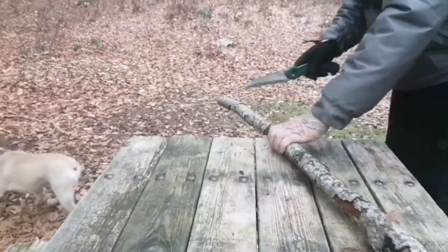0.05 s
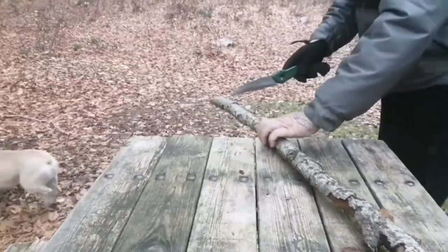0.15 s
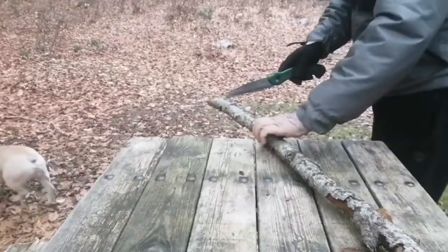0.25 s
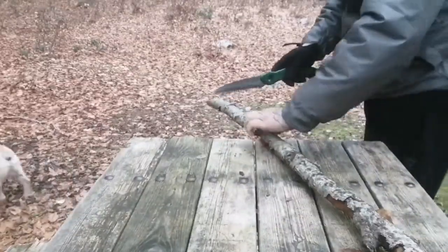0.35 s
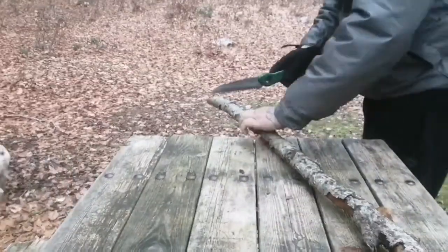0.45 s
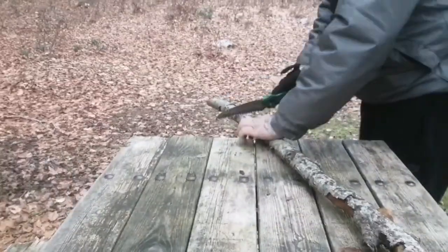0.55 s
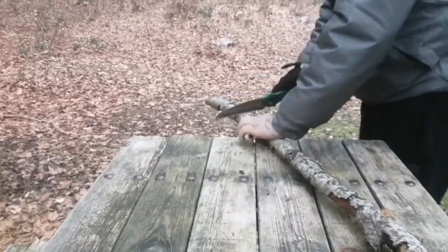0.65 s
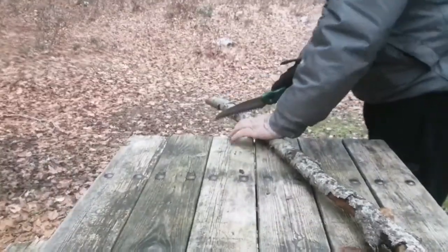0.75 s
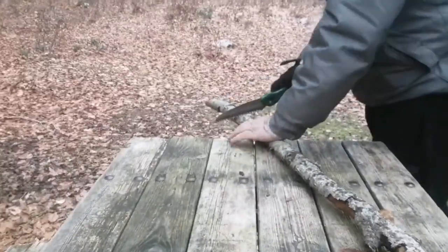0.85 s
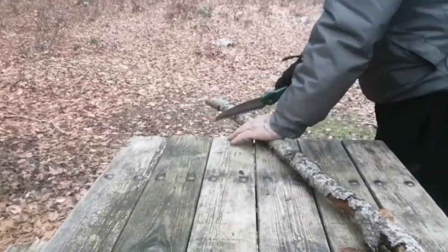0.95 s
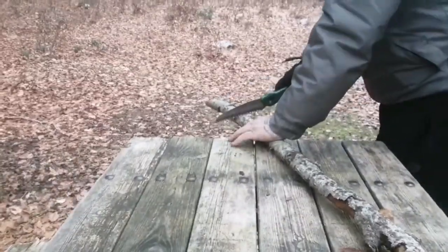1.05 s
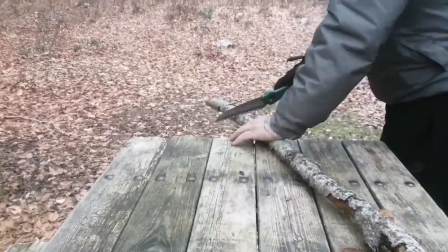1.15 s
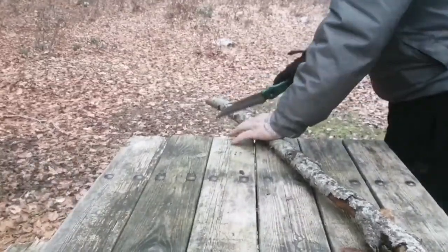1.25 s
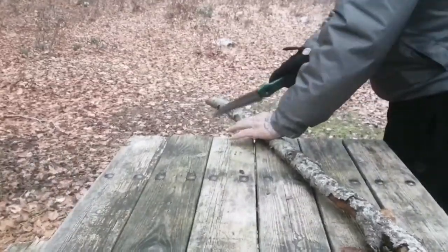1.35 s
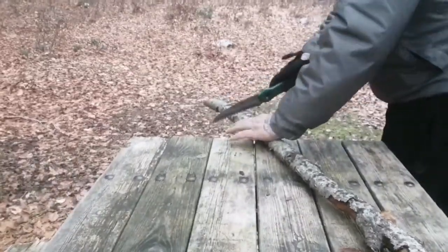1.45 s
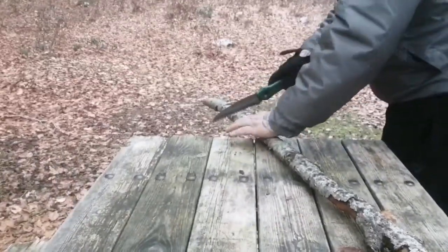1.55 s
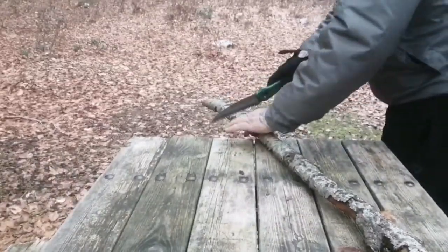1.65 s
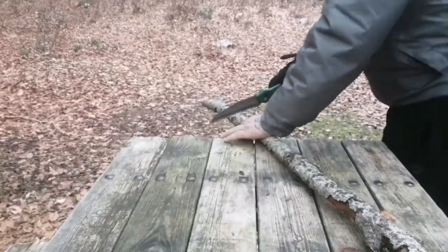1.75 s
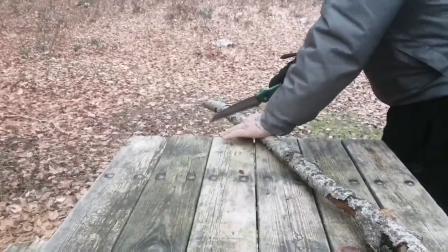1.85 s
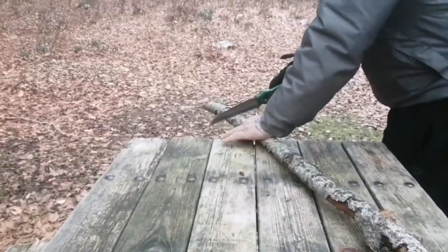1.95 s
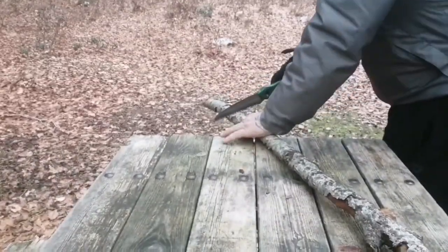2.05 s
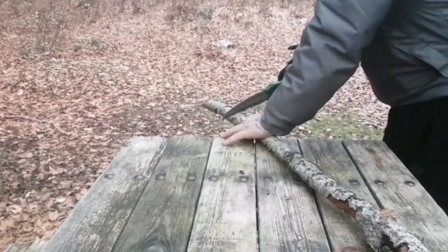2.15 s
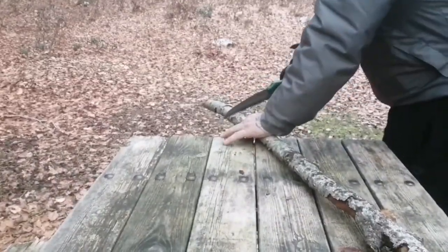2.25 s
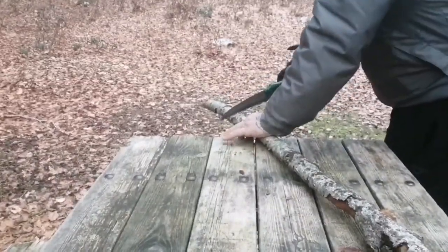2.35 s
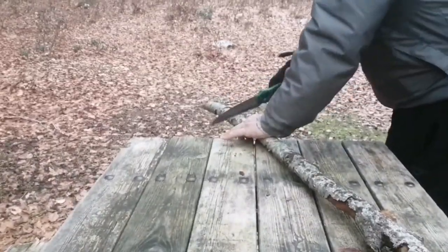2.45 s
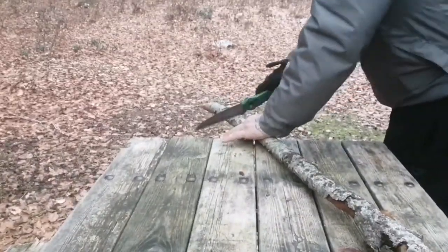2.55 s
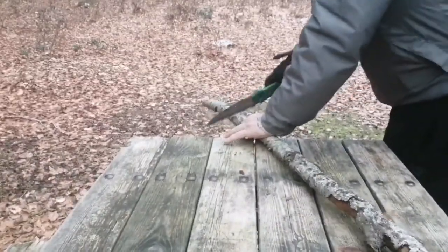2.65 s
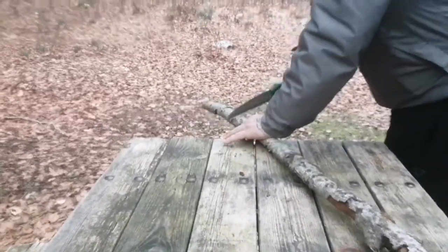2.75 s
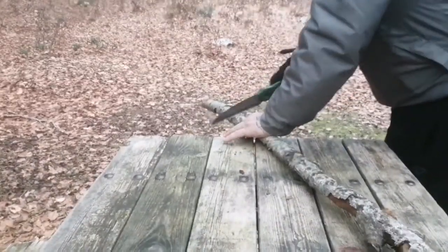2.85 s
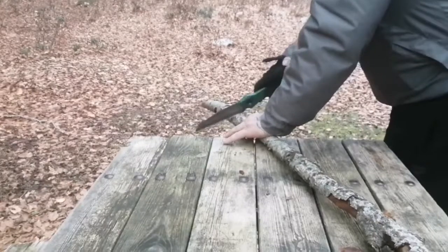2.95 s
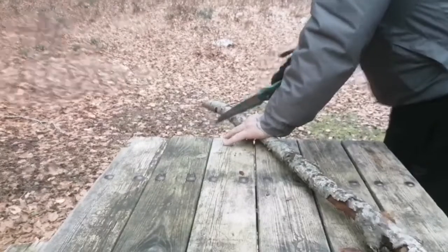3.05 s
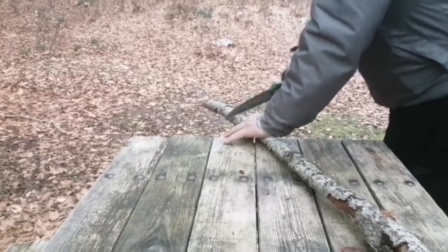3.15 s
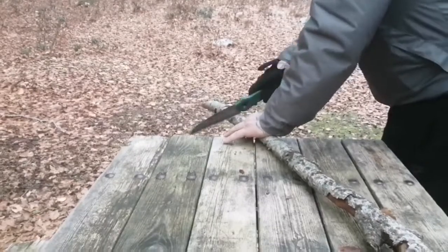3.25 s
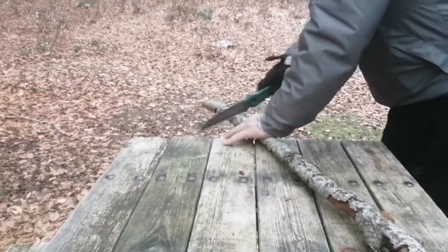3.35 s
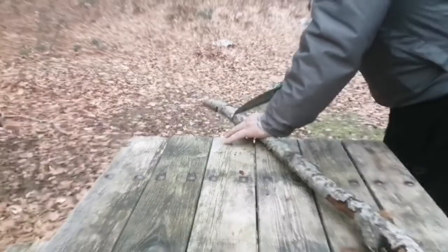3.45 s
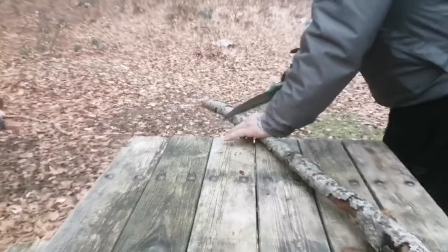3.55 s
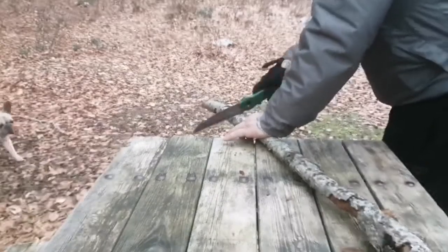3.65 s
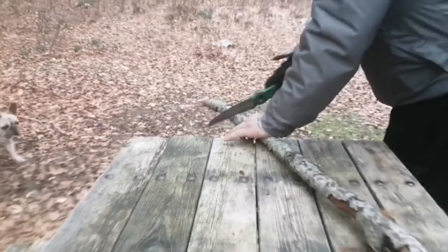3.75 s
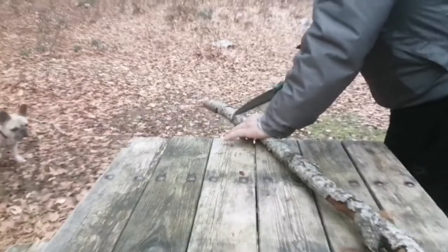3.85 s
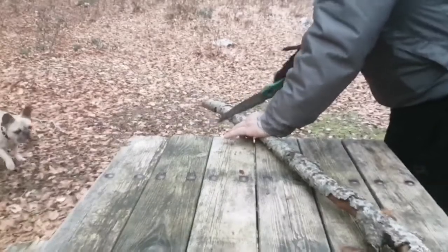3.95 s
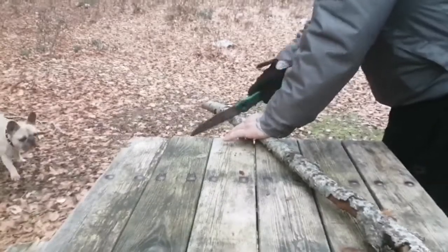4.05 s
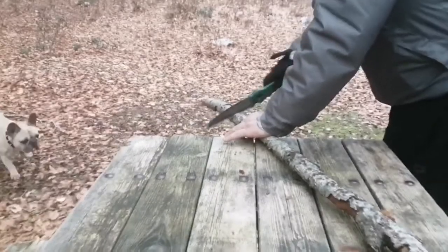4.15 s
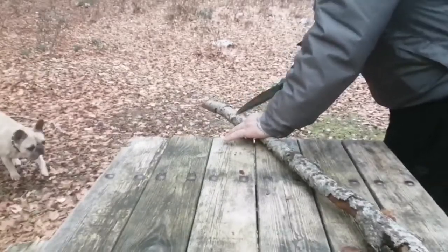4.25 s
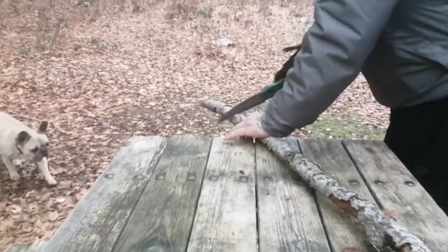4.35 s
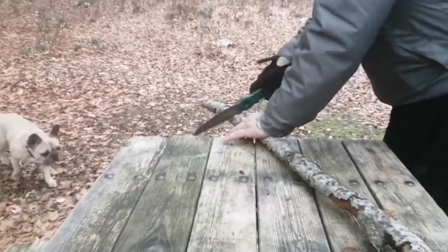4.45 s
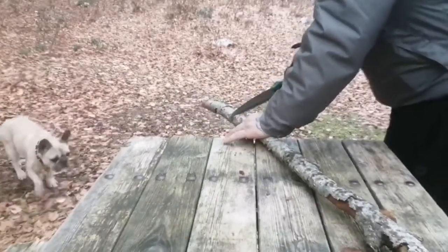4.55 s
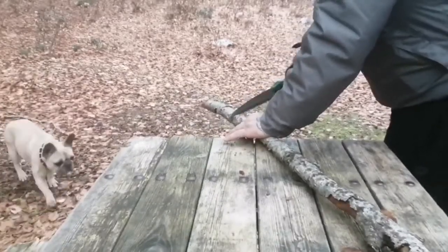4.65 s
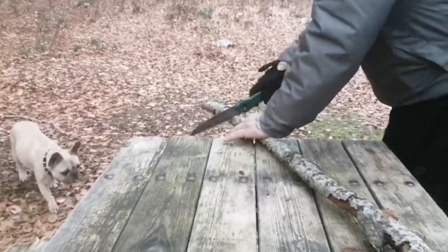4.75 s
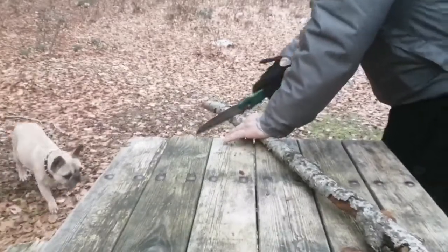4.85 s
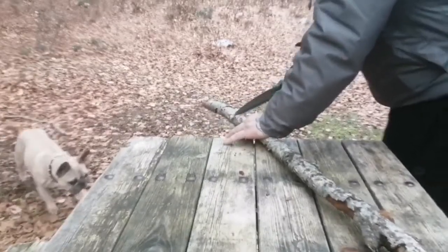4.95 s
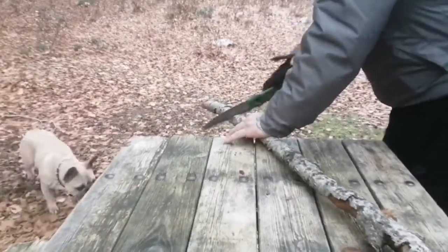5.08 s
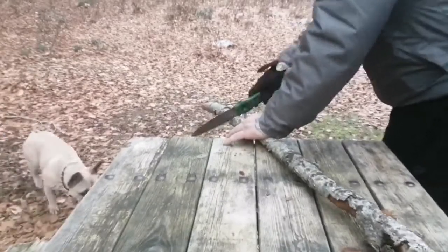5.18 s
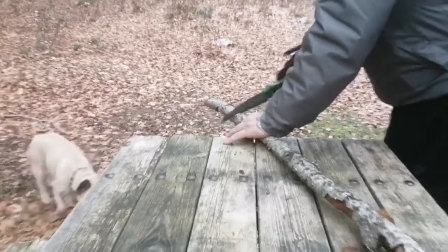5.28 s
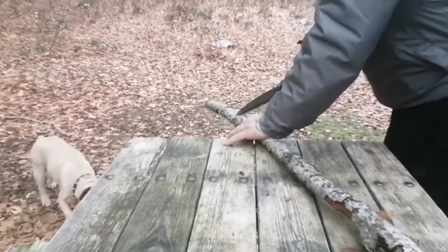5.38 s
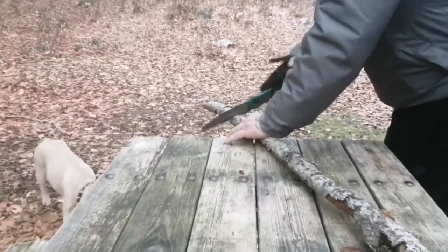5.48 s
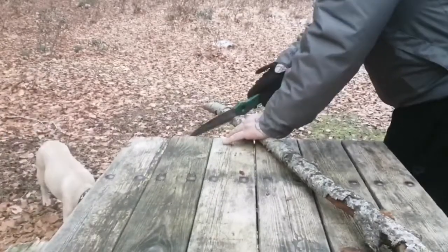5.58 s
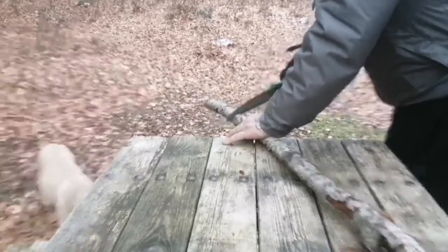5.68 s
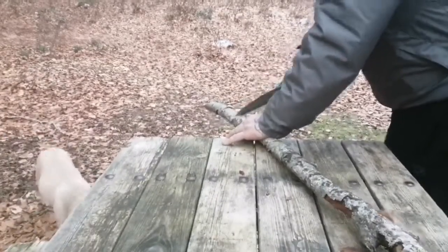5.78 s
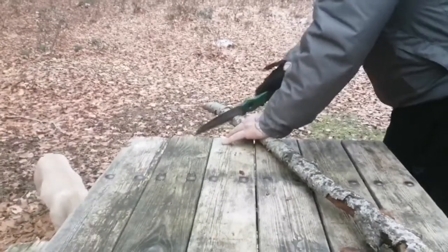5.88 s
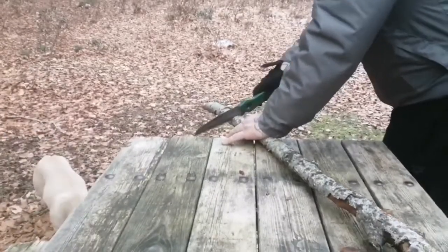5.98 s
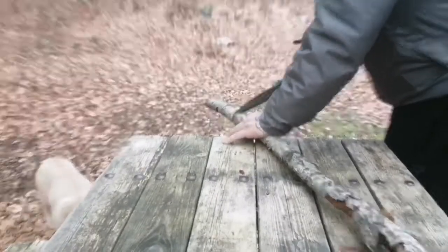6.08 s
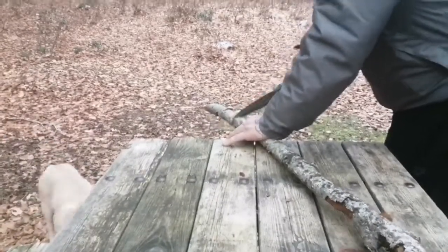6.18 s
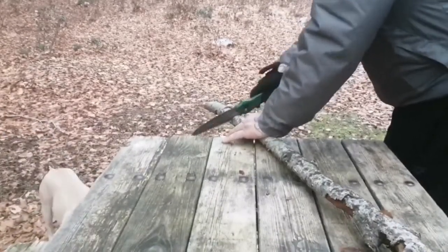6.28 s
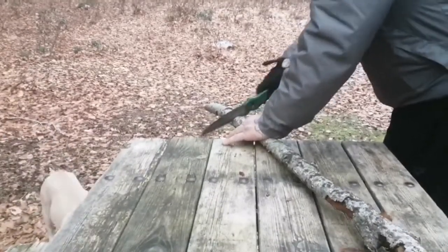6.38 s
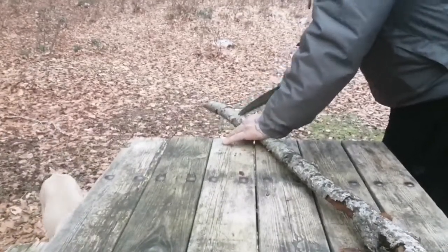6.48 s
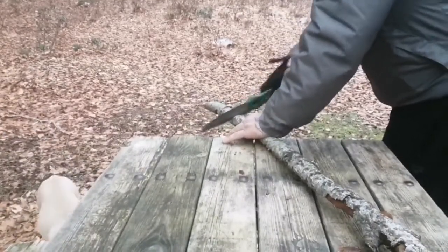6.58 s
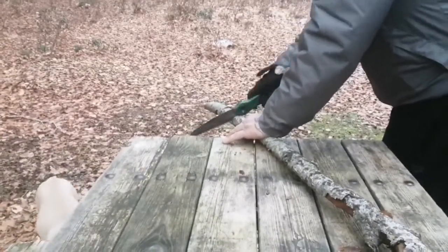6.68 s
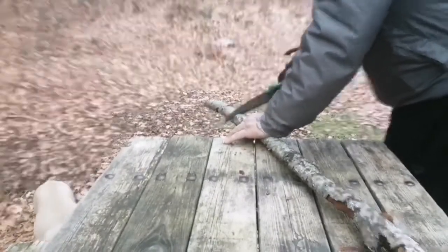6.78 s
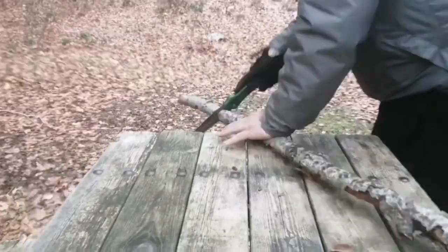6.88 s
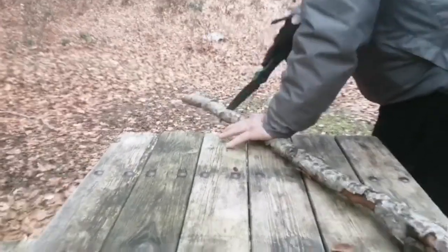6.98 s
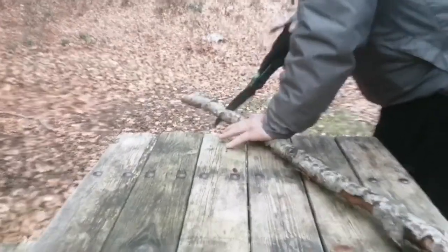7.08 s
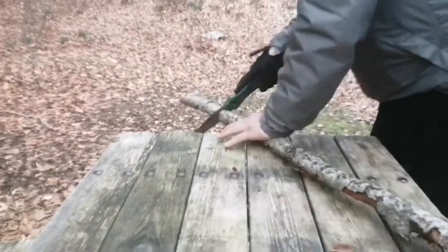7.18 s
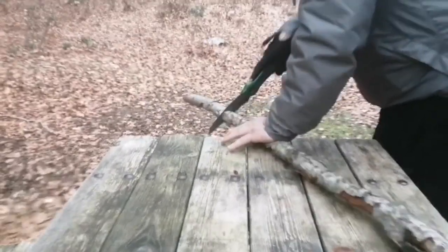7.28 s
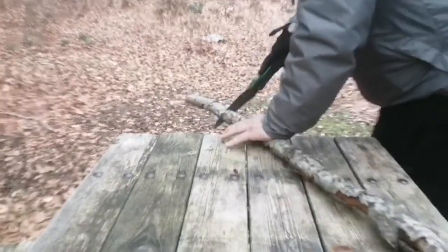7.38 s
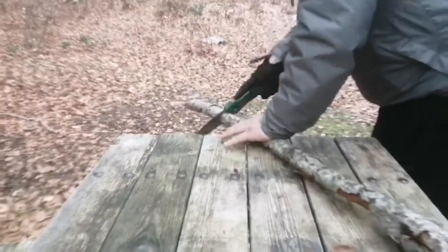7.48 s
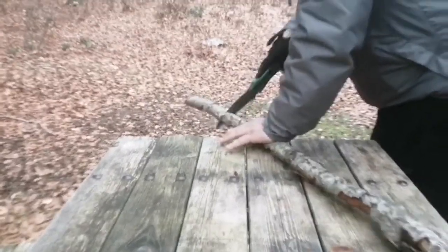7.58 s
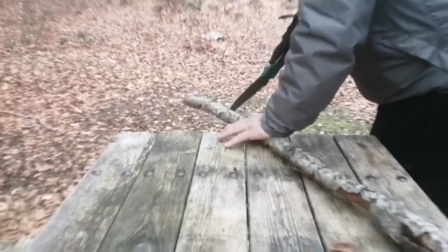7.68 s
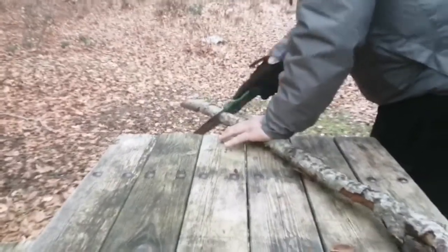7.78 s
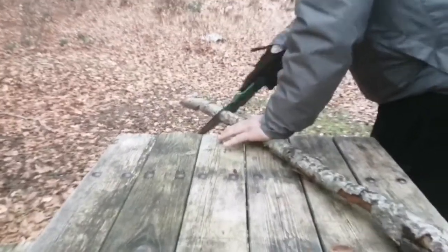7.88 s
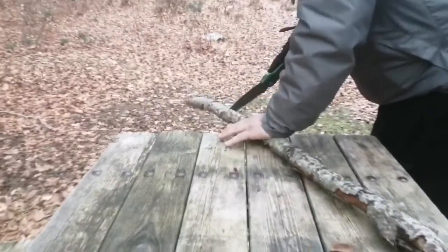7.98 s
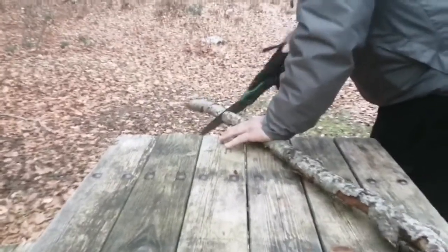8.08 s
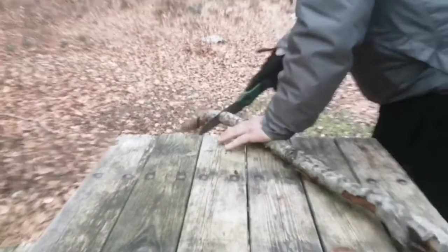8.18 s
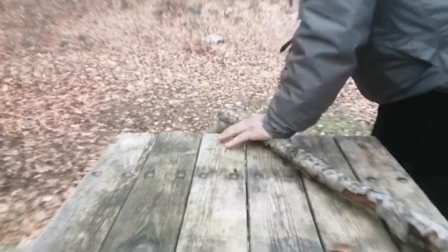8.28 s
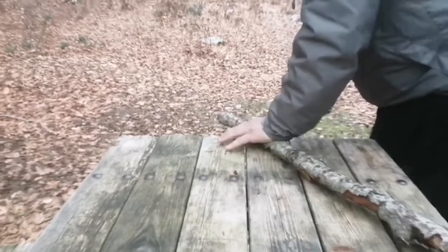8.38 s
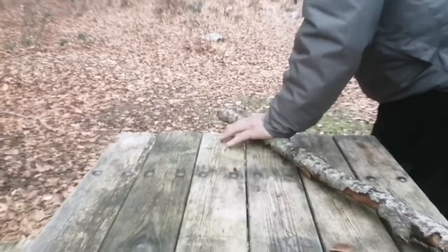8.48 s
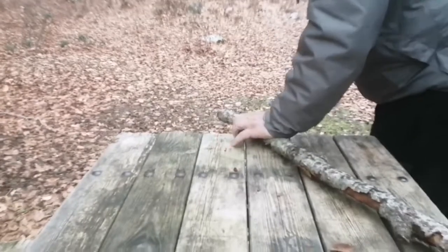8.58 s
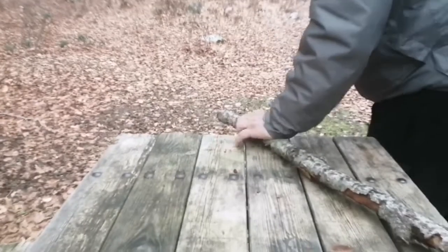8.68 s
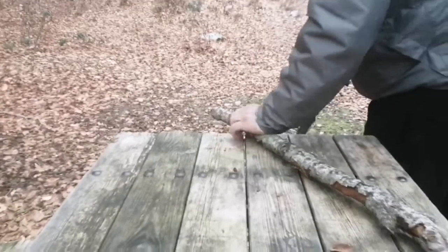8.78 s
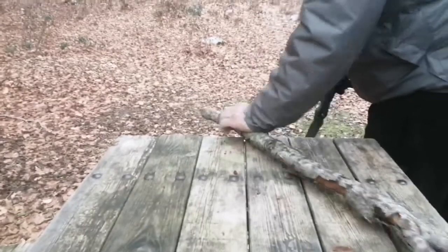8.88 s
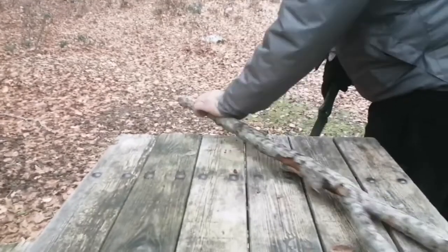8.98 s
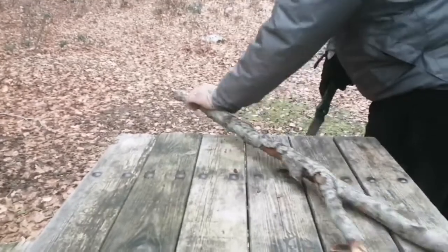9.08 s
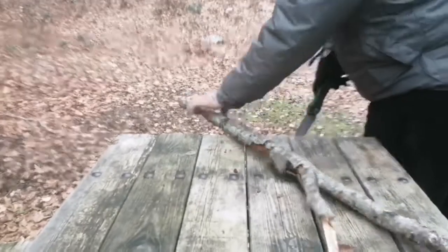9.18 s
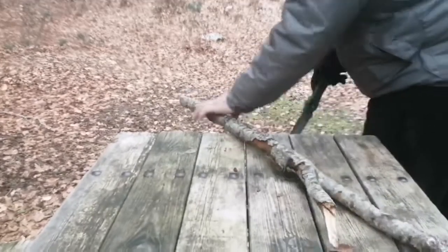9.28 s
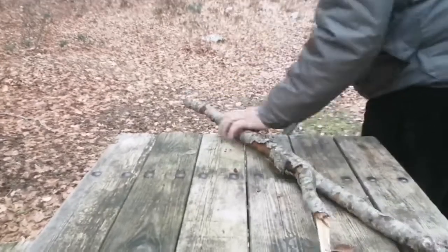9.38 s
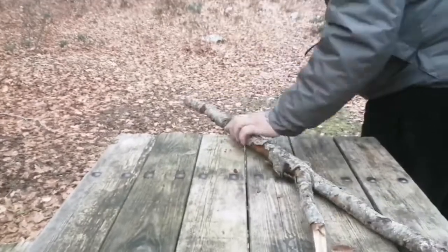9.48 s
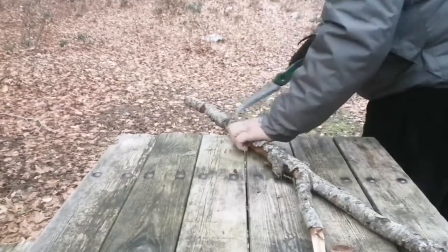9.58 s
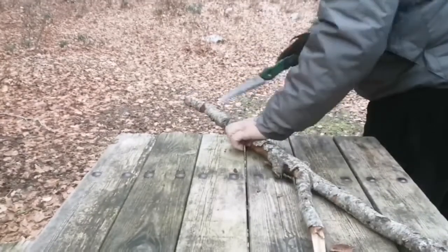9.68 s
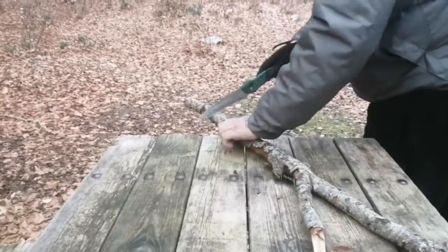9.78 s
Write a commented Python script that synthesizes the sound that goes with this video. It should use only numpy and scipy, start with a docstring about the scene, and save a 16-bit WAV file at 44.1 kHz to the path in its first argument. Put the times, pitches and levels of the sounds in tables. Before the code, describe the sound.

A hand saw rasps back and forth through a branch on a plank table, knocking and juddering, then the branch scrapes and thuds down.

```python
"""Hand saw on a branch

A hand saw cuts a branch held down on a plank table, outdoors among dry leaves. Tooth impulses and noise
drive wooden modes of branch and planks; shaped noise gives rasp and blade hiss. The branch rocks and
knocks, the teeth snag, the blade binds. After the cut the branch is dragged over the table and set down.
A sleeve swishes, leaves crackle, wind and the table shaken by sawing rumble low, all as shaped noise."""
import sys
import numpy as np
from scipy import signal
from scipy.fft import rfft, irfft, next_fast_len
from scipy.io import wavfile
from scipy.ndimage import uniform_filter1d, map_coordinates

SR = 44100
rng = np.random.default_rng(int(sys.argv[2]) if len(sys.argv) > 2 else 0)


def persist_wave(psi):
    """Save psi, clipped to +-1, as 16-bit WAV."""
    counts = np.round(np.clip(psi, -1, 1) * 32767).astype(np.int16)
    wavfile.write(sys.argv[1], SR, np.atleast_2d(counts).T)


N = 433503

# Low rumble of wind and of the table shaken by sawing. Each row: time in seconds, level in dB.
RUMBLE_LEVEL = [(0, -70), (.5, -56), (.85, -47.5), (1.3, -64), (2.3, -47.5), (6.7, -51), (7.1, -39),
                (8.4, -34), (8.8, -51), (9.5, -38.5), (9.83, -64)]
# Faint rustle of dry leaves. Each row: time in seconds, level in dB.
LEAVES_LEVEL = [(0, -47.5), (.48, -71.5), (.6, -58), (1.3, -63.5), (2.8, -59.5), (9.83, -59.5)]
# Swish of a jacket sleeve. Each row: time in seconds, level in dB before a 3 dB cut.
SLEEVE_LEVEL = [(0, -54), (.25, -49.5), (.45, -65)]
# Branch sliding over the planks. Each row: time in seconds, bark hiss in dB, scrape in dB.
DRAG_LEVELS = [(8.66, -54.5, -59), (8.79, -66, -78), (8.87, -42.5, -52.5), (9.0, -47.5, -42),
               (9.05, -36.5, -43), (9.075, -45, -40.5), (9.088, -35.5, -46), (9.17, -37, -41),
               (9.26, -44.5, -47), (9.33, -72, -60)]
# Blade squeaks on the bark. Each row: start in seconds, level in dB, pitch in Hz.
SQUEAKS = [(1.431, -38.5, 2560), (2.454, -40, 2730)]
# Branch laid down, jerked by the jamming blade, set aside. Each row: start in seconds, body peak in dB,
# hardness in dB (before offsets), then relative to the body: crack in dB (before a 4 dB cut),
# boost of the table boom modes in dB, clack in dB.
BRANCH_KNOCKS = [(0.638, -20, -3.5, -17, 12, -36), (0.644, -21, -4, -18, 6, -38),
                 (0.751, -34.5, -14.5, -30, 5, -34), (0.884, -38.5, -5, -30, 5, -32),
                 (1.486, -22.5, -13.5, -17.5, 5.5, -13), (1.493, -24, -17, -30, 2, -15.5),
                 (1.843, -41.5, -6, -10, -8, -20), (6.925, -19.5, 4, -11.5, -13, -14),
                 (7.262, -22, 6, -16, -6, -5), (7.5774, -12, 5, -14.5, -5, -1),
                 (8.206, -15, 9, -16, -1, -1), (8.45, -22.5, -14.5, -29, -12, -22),
                 (8.541, -30, -19, -38, -4, -27), (8.61, -19, -8.5, -21.5, -5, -9),
                 (8.627, -25, -16, -7.5, -6, -17.5), (9.271, -14.5, -16, -14.5, -3, -24),
                 (9.33, -21.5, -16.5, -37, -6, -37), (9.519, -25, -8, -37, -9, -20),
                 (9.594, -27.5, 21, -14, -4, -6.5)]
# Single teeth snag, splinters snap. Each row: start in seconds, peak in dB,
# woody snap over steel ring in dB (before offsets).
TOOTH_CATCHES = [(0.753, -41, -30), (1.389, -45.5, -37), (1.9672, -32.5, -16.5), (6.929, -19, 4),
                 (7.1166, -23, -14), (7.372, -22.5, 12), (7.4065, -21.5, -8), (7.4378, -21, -11),
                 (7.7425, -19.5, -13.5), (7.9327, -23, -4), (8.0766, -22.5, -7), (8.118, -20.5, 3.5),
                 (8.206, -20, 5), (8.234, -15.5, 2), (8.357, -31, -10), (8.402, -28.5, -6.5),
                 (8.6084, -25.5, 15), (8.874, -35, -28), (9.053, -20, -12)]

# Modes of the table top, the branch on it, and the short clack of struck wood.
# Each row: frequency in Hz, level in dB, 60 dB decay in seconds (undamped).
PLANK_MODES = [(59, -13, 0.27), (85, -12, 0.28), (132.8, -10, 0.39), (157.4, -14, 0.33), (209, -4.5, 0.14),
               (238.3, -3, 0.23), (287.5, -1.5, 0.12), (365, 1, 0.078)]
BRANCH_MODES = [(489.7, 1, 0.074), (552, 1.5, 0.023), (651, 0, 0.078), (780, 0, 0.041), (878, -6.5, 0.032),
                (1082, -8.5, 0.036), (1426, -4.5, 0.02), (1524, -10, 0.022), (1915, -14, 0.038)]
CLACK_MODES = [(783, 2.5, 0.031), (1014, 3, 0.016), (1230, -3.5, 0.027), (1518, -6.5, 0.013)]

# Relative spectra, scaled to rms 1 in use. Each row: frequency in Hz, density in dB per Hz.
RUMBLE_SPECTRUM = [(25, -12), (55, -2.5), (100, -7.5), (400, -29), (1000, -101)]
LEAVES_SPECTRUM = [(100, 0), (1700, -19.5), (3200, -18), (4000, -25), (6400, -12), (7400, -15.5),
                   (7900, -50.5)]
CLOTH_SPECTRUM = [(200, -33), (500, -4), (1700, -25.5), (3200, -5.5), (4000, -12.5), (7000, 0.5),
                  (7900, -33)]
BARK_SPECTRUM = [(600, -33.5), (1100, -8), (1400, -9), (2100, -14.5), (3200, -6), (3900, -14), (5000, -0.5),
                 (6300, 3.5), (7300, 2), (7900, -37)]
SNAP_SPECTRUM = [(500, 4), (1100, 7), (1600, -2.5), (2200, -8.5), (3200, -7.5), (4000, -25), (7000, -36.5)]
BUZZ_SPECTRUM = [(100, -23), (220, 4.5), (700, -5), (1300, -18.5), (4000, -68.5)]
RASP_SPECTRUM = [(500, -19.5), (1000, 5), (1300, -12), (1550, -4.5), (1900, -8.5), (2250, -13.5),
                 (2950, -8), (3900, -16), (5000, -10.5), (7500, -43)]
BLADE_SPECTRUM = [(2500, -60.5), (4000, -26.5), (4600, -6), (5300, 2), (5900, 4.5), (6400, 3.5),
                  (7100, 7.5), (7600, -19)]

# Saw pushes: the first is a light trial, the one at 6.8 s jams at once. Each row: start in seconds,
# force in dB, extra plank thrum in dB, tooth catch peak in dB, delay of the rocking knock in seconds,
# peak of that knock in dB.
PUSHES = [(2.072, -18.5, 5, -50.5, 0.062, -38), (2.643, 2.5, -3, -38.5, 0.077, -16.5),
          (3.012, 2, 8.5, -34, 0.074, -25), (3.385, 0.5, 7, -27, 0.06, -16),
          (3.759, -1, 1.5, -36, 0.066, -16), (4.157, 1.5, -12.5, -24, 0.062, -22),
          (4.533, 0, -2.5, -27, 0.068, -17.5), (4.912, 1, -3, -29.5, 0.068, -19.5),
          (5.288, -0.5, -5, -28, 0.079, -17), (5.68, 0.5, -1.5, -27.5, 0.08, -17.5),
          (6.049, -0.5, 1, -27.5, 0.087, -13), (6.417, -1.5, -5, -30.5, 0.054, -26.5),
          (6.804, -10, -18, -24.5, .056, -18.5), (6.977, -3.5, 0.5, -15.5, 0.068, -8.5),
          (7.296, -3.5, 6.5, -24, 0.075, -10), (7.624, -1, 1.5, -41, 0.076, -16),
          (7.941, 1, -5.5, -29.5, .065, -15.5), (8.239, 2, 2, -28, 0.096, -18.5)]
# Saw pulls. Each row: start in seconds, force in dB, delay until the blade binds in seconds,
# peak judder level in dB.
PULLS = [(2.418, -2.5, 0.15, -36), (2.838, 0, 0.12, -26.5), (3.21, 0, 0.12, -27.5),
         (3.584, -0.5, 0.11, -26.5), (3.963, -1.5, 0.12, -30), (4.353, 1, 0.13, -37),
         (4.739, 1, 0.12, -22.5), (5.114, 1.5, 0.12, -27), (5.504, 1, 0.13, -30.5), (5.879, 2, 0.14, -31),
         (6.246, 0, 0.14, -28), (6.616, -1, .114, -27.5), (6.847, -0.5, 0.074, -28.5),
         (7.148, -1.5, 0.097, -28.5), (7.472, 2, .094, -24), (7.792, 1.5, 0.1, -27),
         (8.099, 2.5, 0.089, -36)]
# Times in seconds when the cut is fresh, deep and nearly through.
STAGES_S = [2.4, 6.4, 7.1]
# Stroke sound, one row per stage: fastest moment as a share of the stroke, then in dB at force 0:
# plank thrum, branch growl, rasp, blade hiss, boost of the table boom modes, tooth buzz.
PUSH_SOUND = [(.55, -35, -39, -47.5, -47.5, 19.5, -49), (.54, -34.5, -40.5, -46, -45.5, 6.5, -50.5),
              (.48, -36.5, -41.5, -48, -46.5, -14.5, -46.5)]
PULL_SOUND = [(0.5, -33.5, -36, -48.5, -47.5, 9, -43.5), (.5, -34.5, -34, -46, -48, -8, -39),
              (.6, -33.5, -33.5, -47.5, -46.5, -9, -43.5)]
# One value per stage: level of breaking fibres within the rasp in dB.
SPLINTER_DB = (2.5, -3, 11)
# One value per stage: centre of the wood note at a catch in Hz.
CATCH_NOTE_HZ = (1560, 1540, 1005)
# One value per stage: woody snap over steel ring at a push in dB (before offsets).
CATCH_WOOD_DB = (-11.5, -4, -0.5)
# One value per stage: clack of the rocking branch in dB.
ROCK_CLACK_DB = (-20.5, -17, -21.5)
# One value per stage: boost of the table boom modes when the branch rocks in dB.
ROCK_BOOM_DB = (1.5, -4, -9)
# Rocking knock per stage: hardness and crack, before the same offsets as in the knock table.
ROCK_HARD_DB, ROCK_CRACK_DB = (-16, -10.5, -10), (-24, -31, -31)

PUSH_TOOTH_HZ, PUSH_GROWL_HZ = 521.3, 930  # top tooth rate, growl centre
PULL_TOOTH_HZ, PULL_GROWL_HZ = (559.2, 661.5, 493.7), (735, 656, 486)  # the same per stage
# scatter of the bites in tooth spacings; pulls per stage
PUSH_JITTER, PULL_JITTER = .2, (.13, .1, .13)
GROWL_PER_FORCE, RASP_PER_FORCE, HISS_PER_FORCE = 0.45, 0.94, 1.12  # dB per dB of force
CUT_THROUGH_S, LONGEST_STROKE_S = 8.374, .266
CATCH_AFTER_S = .015  # from the start of a push
# blade note: level over the hiss
RING_HZ, RING_WIDTH_HZ, RING_DB = 6040, 200, 4
# where along its travel the blade rings (0 pushed in, 1 drawn back), and over what share
RING_PLACE, RING_REACH = 0.32, 0.092
# binding per stage: surge of the cutting noise, pitch of the judder at its middle
BIND_DB, JUDDER_HZ = (5, 1.5, 2.5), (270.3, 276, 450)
BIND_S, JUDDER_SAG_PER_S = 0.019, 3.5  # Gaussian half length; share of pitch lost per second
TOP_HZ = 7790  # band limit


def amp(db):
    """Decibels to gain."""
    return 10 ** (np.asarray(db) / 20)


def unit(x):
    """Scale to rms 1."""
    return x / np.sqrt(np.mean(x ** 2) + 1e-20)


def curves(rows):
    """One value per sample for each dB column, -120 dB outside the rows."""
    s, *columns = np.transpose(rows)
    return [np.interp(np.arange(N) / SR, s, column, left=-120, right=-120) for column in columns]


def wobble(rate_hz):
    """Smooth random curve with rate_hz knots a second."""
    knots = rng.standard_normal(int(N * rate_hz / SR) + 4)
    return map_coordinates(knots, [np.arange(N) * rate_hz / SR])


def filtered(x, gain):
    """x times a gain that depends on frequency."""
    size = next_fast_len(len(x) + 8192)
    spectrum = rfft(x, size) * gain(np.fft.rfftfreq(size, 1 / SR))
    return irfft(spectrum, size)[:len(x)]


def coloured(x, spectrum):
    """x shaped by a (Hz, dB) spectrum, at rms 1."""
    hz, db = np.transpose(spectrum)
    return unit(filtered(x, lambda f: amp(np.interp(np.log(f + 1), np.log(hz), db))))


def patchy(depth_db):
    """Noise whose narrow bands swell and fade on their own."""
    bands = signal.stft(rng.standard_normal(N), nperseg=512)[2]
    field = uniform_filter1d(rng.standard_normal(bands.shape), size=4, axis=0)
    field = uniform_filter1d(field, size=4, axis=1)
    return signal.istft(bands * amp(depth_db * unit(field)), nperseg=512)[1][:N]


def add(track, s, sound):
    """Mix a sound into the track at time s."""
    start = max(round(s * SR), 0)
    part = sound[:N - start]
    track[start:start + len(part)] += part


def by_depth(s, stages):
    """Values that pass from stage to stage as the cut deepens."""
    shares = [np.interp(s, STAGES_S, stage) for stage in np.eye(len(STAGES_S))]
    return np.dot(shares, stages)


def ring(modes, scatter_db, detune, damping=1, boom_db=0, boom_hz=138, direct=False):
    """Impulse response of wooden modes, a little different at each contact; energy 1."""
    t = np.arange(SR // 3) / SR
    hz, db, t60 = np.transpose(modes)[:, :, None]
    size, shift = rng.standard_normal((2, len(modes), 1))
    # where and how hard the wood is pressed favours the modes around one frequency
    boom = boom_db * np.exp(-(np.log2(hz / boom_hz) / .35) ** 2)
    decay = amp(db + boom + scatter_db * size - 60 * t * damping / t60)
    # a direct blow starts all modes together; from farther along the wood their signs alternate
    sign = 1 if direct else (-1) ** np.arange(len(modes))[:, None]
    h = np.sum(sign * decay * np.sin(2 * np.pi * hz * (1 + detune * shift) * t), axis=0)
    # wood radiates little below its lowest mode
    h = signal.lfilter(*signal.butter(2, hz.min() / 2, "high", fs=SR), h)
    return h / np.linalg.norm(h)


def low_rumble():
    """Low rumble of wind and of the table shaken by sawing: low noise in random swells."""
    swells = amp(5.7 * wobble(9.7))
    return amp(curves(RUMBLE_LEVEL)[0]) * coloured(rng.standard_normal(N) * swells, RUMBLE_SPECTRUM)


def dry_leaves():
    """Leaf crackle: noise with fast, medium and slow random level swings."""
    crackle = amp(3 * wobble(300) + 2 * wobble(25) + 1.5 * wobble(3))
    return amp(curves(LEAVES_LEVEL)[0]) * coloured(rng.standard_normal(N) * crackle, LEAVES_SPECTRUM)


def sleeve():
    """Cloth friction: noise roughened by random level swings."""
    weave = amp(2.6 * wobble(400) + 1.8 * wobble(70))
    return amp(curves(SLEEVE_LEVEL)[0] - 3.0) * coloured(rng.standard_normal(N) * weave, CLOTH_SPECTRUM)


def drag():
    """Rough bark skids over the grain of the planks and shakes branch and table."""
    hiss_db, scrape_db = curves(DRAG_LEVELS)
    grain = amp(2 * wobble(500) + 1.8 * wobble(45))
    hiss = coloured(grain * patchy(depth_db=2.2), BARK_SPECTRUM)
    branch = ring(BRANCH_MODES, scatter_db=2.0, detune=0.08)
    planks = ring(PLANK_MODES, scatter_db=3.0, detune=0.012, boom_db=-15)
    scrape = unit(signal.fftconvolve(grain * rng.standard_normal(N), branch + 0.92 * planks)[:N])
    return amp(hiss_db) * hiss + amp(scrape_db) * scrape


def squeaks(slip_s=0.0076, swell_s=0.0016, fade_db=1.5, grit_db=-18):
    """The blade sticks and slips on the bark three times, each slip a tiny squeal."""
    out, t = np.zeros(N), np.arange(SR // 30) / SR
    swell = (t / swell_s) ** 2 * np.exp(2 - 2 * t / swell_s)
    for s, db, hz in SQUEAKS:
        for slip in range(3):
            phase_drift = np.cumsum(0.17 * rng.standard_normal(len(t)))
            tone = np.sin(2 * np.pi * hz * t + phase_drift)
            grit = amp(grit_db) * coloured(rng.standard_normal(len(t)), BARK_SPECTRUM)
            add(out, s + slip_s * slip, amp(db - fade_db * slip) * swell * (tone + grit))
    return out


def rocking():
    """Each push tips the branch, which falls back on the planks; rows as in BRANCH_KNOCKS."""
    stage_tables = ROCK_HARD_DB, ROCK_CRACK_DB, ROCK_BOOM_DB, ROCK_CLACK_DB
    return [(s + delay_s, db, *(by_depth(s, stages) for stages in stage_tables))
            for s, *_, delay_s, db in PUSHES]


def knocks(crack_t60=0.047, chatter_t60=0.065, chatter_db=-25, contact_hz=1150):
    """The branch drops onto the planks, chatters briefly and rings both."""
    out, t = np.zeros(N), np.arange(SR // 3) / SR
    for s, db, hard_db, crack_db, boom_db, clack_db in BRANCH_KNOCKS + rocking():
        # a branch pressed hard enough to clack is also damped
        damping = np.interp(clack_db, [-20, 0], [1, 1.9])
        planks = ring(PLANK_MODES, scatter_db=4.5, detune=0.03, damping=damping,
                      boom_db=boom_db, direct=True)
        branch = ring(BRANCH_MODES, scatter_db=2.5, detune=0.035, damping=1.25 * damping,
                      boom_db=4, boom_hz=530, direct=True)
        chatter = amp(chatter_db - 60 * t / chatter_t60) * rng.standard_normal(len(t))
        chatter[0] = 1
        body = signal.fftconvolve(planks + amp(hard_db + 7) * branch, chatter)[:len(t)]
        # a softer blow stays in contact longer and leaves out the upper modes
        cutoff_hz = min(contact_hz * amp(hard_db / 2), SR / 4)
        body = signal.lfilter(*signal.butter(3, cutoff_hz, fs=SR), body)
        clack = signal.fftconvolve(ring(CLACK_MODES, scatter_db=4, detune=0.045), chatter)[:len(t)]
        crack = coloured(rng.standard_normal(len(t)), BARK_SPECTRUM) * amp(-60 * t / crack_t60)
        sound = body / np.abs(body).max()
        sound += amp(clack_db) * clack / np.abs(clack).max()
        sound += amp(crack_db - 4.0) * crack
        add(out, s, amp(db) * sound)
    return out


def snagging():
    """The teeth catch just after each push begins; rows as in TOOTH_CATCHES."""
    return [(s + CATCH_AFTER_S, db, by_depth(s, CATCH_WOOD_DB)) for s, _, _, db, *_ in PUSHES]


def catches(snap_t60=0.03, note_t60=0.027, slip_s=0.015, slip_db=-21, ping_hz=6700, ping_db=-1):
    """A tooth slips, then snags: a dry snap, a short note in the wood and a ring of steel."""
    out, t = np.zeros(N), np.arange(SR // 10) / SR
    onset = 1 - np.exp(-t / 0.00031)
    for s, db, wood_db in TOOTH_CATCHES + snagging():
        centres_hz = np.array([by_depth(s, CATCH_NOTE_HZ), ping_hz])
        note_hz, steel_hz = centres_hz * (1 + .04 * rng.standard_normal(2))
        for at, contact_db in (s - slip_s, slip_db), (s, 0):
            wood, steel = rng.standard_normal((2, len(t)))
            snap = amp(wood_db + 10.5) * coloured(wood, SNAP_SPECTRUM) + coloured(steel, BLADE_SPECTRUM)
            snap *= amp(-60 * t / snap_t60)
            note = amp(wood_db + 4.5 - 60 * t / note_t60) * np.sin(2 * np.pi * note_hz * t)
            ping = amp(ping_db - 60 * t / note_t60) * np.sin(2 * np.pi * steel_hz * t)
            sound = (snap + note + ping) * onset
            add(out, at, amp(db + contact_db) * sound / np.abs(sound).max())
    return out


def splinters(count=420, centre_hz=1450, spread_octaves=.4, t60=0.026):
    """Single fibres break at random, each a short woody note; level follows cut depth."""
    out, t = np.zeros(N), np.arange(SR // 20) / SR
    times = rng.uniform(STAGES_S[0], CUT_THROUGH_S, count)
    pitches = np.clip(rng.standard_normal(count), -2, 2)
    for s, pitch in zip(times, pitches):
        note = np.sin(2 * np.pi * centre_hz * 2 ** (spread_octaves * pitch) * t)
        add(out, s, note * amp(by_depth(s, SPLINTER_DB) - 60 * t / t60))
    return out


def binding():
    """In each pull the blade binds, the branch judders at a falling pitch; gives judder and surge in dB."""
    judder, surge_db = np.zeros((2, N))
    t = np.arange(-SR // 10, SR // 10) / SR
    swell, waver = np.exp(-(t / BIND_S) ** 2), wobble(120)
    for s, _, delay_s, db in PULLS:
        bend = 1 - JUDDER_SAG_PER_S * t + .05 * waver[int(s * SR):][:len(t)]
        phase = 2 * np.pi * np.cumsum(by_depth(s, JUDDER_HZ) * bend) / SR
        start = s + delay_s + t[0]
        add(judder, start, amp(db) * swell * (np.sin(phase) + .22 * np.sin(2 * phase)))
        add(surge_db, start, by_depth(s, BIND_DB) * swell)
    return judder, surge_db


def strokes():
    """Pushes and pulls in time order, ending at the next or at a limit; direction, depth, force set sound."""
    moves = [(s, force_db, thrum_db, PUSH_TOOTH_HZ, PUSH_GROWL_HZ, False)
             for s, force_db, thrum_db, *_ in PUSHES]
    moves += [(s, force_db, 0, by_depth(s, PULL_TOOTH_HZ), by_depth(s, PULL_GROWL_HZ), True)
              for s, force_db, *_ in PULLS]
    moves.sort()
    turns = [move[0] for move in moves[1:]] + [CUT_THROUGH_S]
    for (s, force_db, thrum_db, tooth_hz, growl_hz, pulled), turn in zip(moves, turns):
        sound = by_depth(s, PULL_SOUND if pulled else PUSH_SOUND)
        # same columns as the stroke sound tables
        extra = [0, force_db + thrum_db, GROWL_PER_FORCE * force_db, RASP_PER_FORCE * force_db,
                 HISS_PER_FORCE * force_db, 0, force_db]
        jitter = by_depth(s, PULL_JITTER) if pulled else PUSH_JITTER
        yield s, min(turn, s + LONGEST_STROKE_S), pulled, tooth_hz, growl_hz, jitter, sound + extra


def teeth(rate_hz, jitter, size_db):
    """One impulse of random size whenever a tooth meets the wood; power 1."""
    phase = np.cumsum(rate_hz) / SR
    tooth = np.arange(1, int(phase[-1]))
    late, size = rng.standard_normal((len(tooth), 2)).T
    at = np.interp(tooth + jitter * late, phase, np.arange(len(phase))).astype(int)
    return unit(np.bincount(at, amp(size_db * size), len(phase)))


def saw(chip_db=1.8, grab_db=0.5, deep_grab_db=3, tearing=0.91, focus_db=6):
    """Each stroke speeds up and stops; tooth rate and loudness follow the speed of the blade."""
    wood, bites, rasp_level, hiss_level, ring_level = np.zeros((5, N))
    # the blade grabs and frees itself, more roughly when the cut is nearly through
    grab = amp(np.interp(np.arange(N) / SR, [6.3, 7.2], [grab_db, deep_grab_db]) * wobble(55))
    for start, end, pulled, tooth_hz, growl_hz, jitter, sound in strokes():
        fastest, thrum_db, growl_db, rasp_db, hiss_db, boom_db, buzz_db = sound
        u = np.linspace(0, 1, max(int((end - start) * SR), 2000))
        travel = np.interp(u, [0, np.clip(fastest, .2, .8), 1], [0, .5, 1])
        speed = np.abs(np.sin(np.pi * travel))
        grip = unit(grab[int(start * SR):][:len(u)])
        pulses = teeth(tooth_hz * (.12 + .88 * speed), jitter, size_db=3)
        tooth_wave = pulses - pulses.mean()

        # teeth and tearing fibres shake the branch; the heavy planks answer more late in the stroke
        force = grip * unit(tooth_wave + tearing * rng.standard_normal(len(u)))
        on_branch = force * speed ** 0.93
        on_planks = force * speed ** 0.99 * (.5 + u)
        branch = ring(BRANCH_MODES, scatter_db=2.5, detune=0.0098, boom_db=focus_db, boom_hz=growl_hz)
        planks = ring(PLANK_MODES, scatter_db=3.5, detune=0.027, boom_db=boom_db)
        growl = signal.fftconvolve(on_branch, branch)
        thrum = signal.fftconvolve(on_planks, planks)
        add(wood, start, amp(growl_db) * growl + amp(thrum_db) * thrum)
        # the tooth rate itself is heard as a buzz
        buzz = grip * speed * (.5 + u) * coloured(tooth_wave, BUZZ_SPECTRUM)
        add(wood, start, amp(buzz_db) * buzz)

        # the cutting noise levels off once the teeth are moving well
        cutting = grip * np.tanh((speed / 0.54) ** 1.85)
        add(bites, start, pulses)
        add(rasp_level, start, amp(rasp_db) * cutting)
        add(hiss_level, start, amp(hiss_db) * cutting)
        place = u if pulled else 1 - u
        ring_here = np.exp(-((place - RING_PLACE) / RING_REACH) ** 2)
        add(ring_level, start, amp(hiss_db + RING_DB) * cutting * ring_here)

    # every bite tears a 1.8 ms burst of fibres and rings the steel, over a steady floor
    burst = unit(signal.lfilter([1], [1, -np.exp(-1 / (.0018 * SR))], bites)) + .45
    rasp = coloured(burst * patchy(depth_db=3.5), RASP_SPECTRUM) + splinters()
    hiss = coloured(burst * patchy(depth_db=3.5) * amp(chip_db * wobble(90)), BLADE_SPECTRUM)
    blade_note = unit(filtered(burst * rng.standard_normal(N),
                               lambda hz: 1 / (1 + ((hz - RING_HZ) / RING_WIDTH_HZ) ** 2)))
    judder, surge_db = binding()
    cutting_noise = rasp_level * rasp + hiss_level * hiss + ring_level * blade_note
    return wood + judder + amp(surge_db) * cutting_noise


def scene():
    """Mono sum of all sources."""
    background = low_rumble() + dry_leaves() + sleeve()
    contacts = drag() + squeaks() + knocks() + catches()
    return (background + contacts + saw())[None]


def record(dry):
    """Steep low-pass at the band limit."""
    return filtered(dry[0], lambda hz: 1 / np.sqrt(1 + np.minimum(hz / TOP_HZ, 2) ** 120))[None]


dry = scene()
out = record(dry)
persist_wave(out)
```